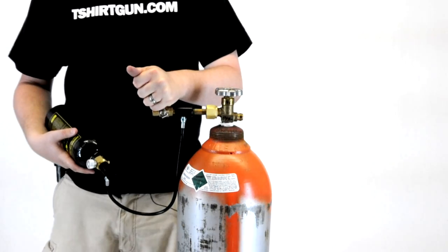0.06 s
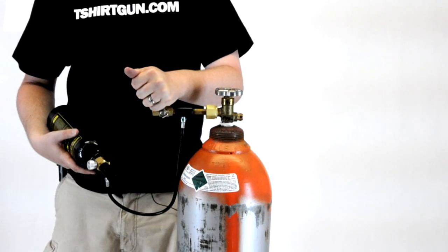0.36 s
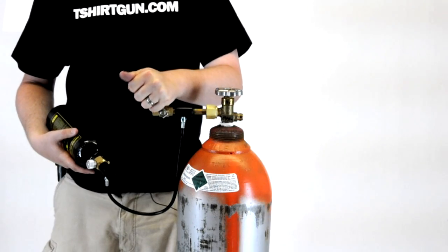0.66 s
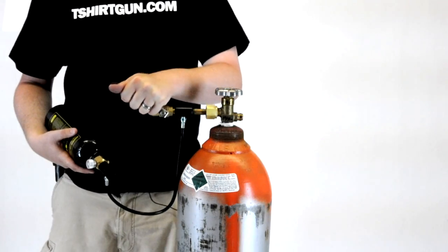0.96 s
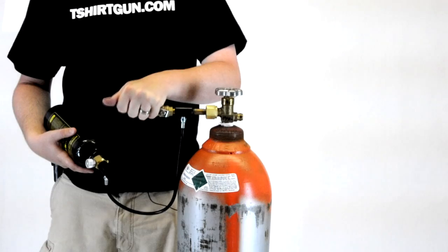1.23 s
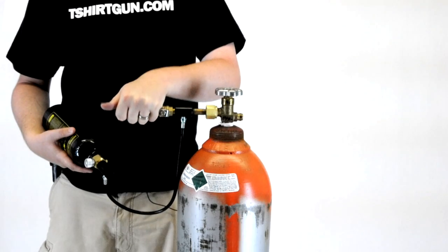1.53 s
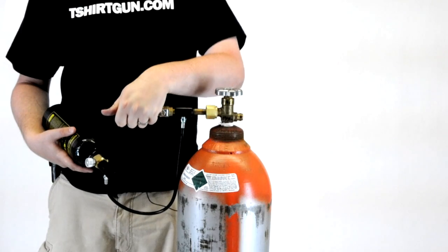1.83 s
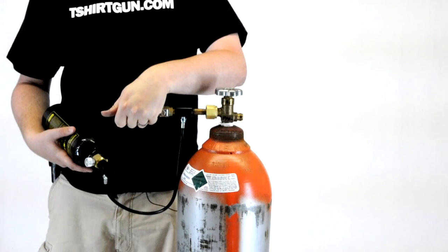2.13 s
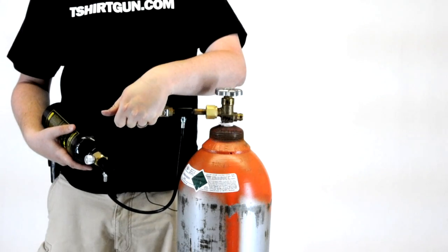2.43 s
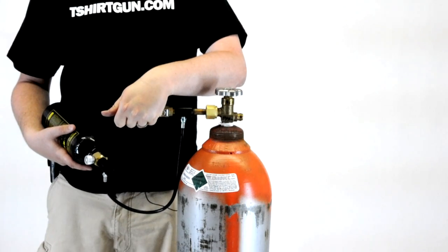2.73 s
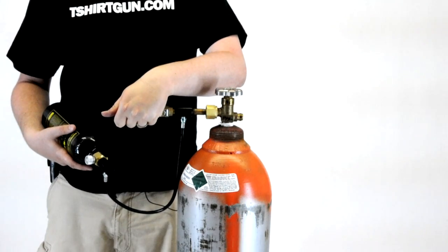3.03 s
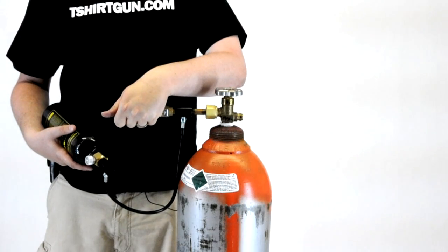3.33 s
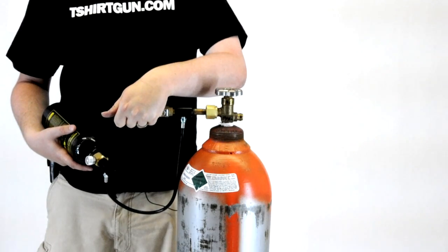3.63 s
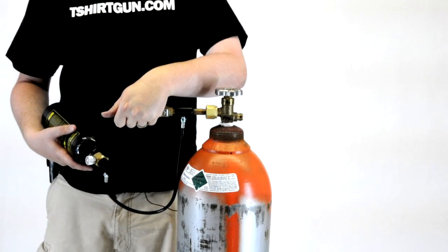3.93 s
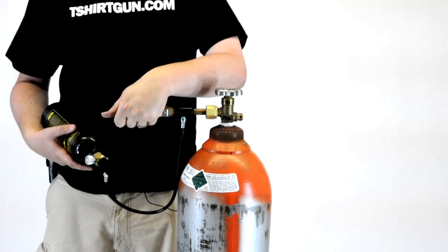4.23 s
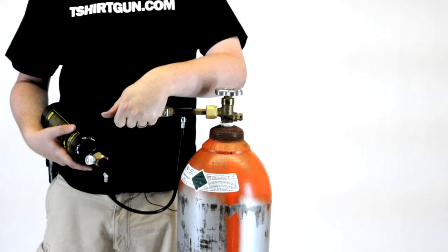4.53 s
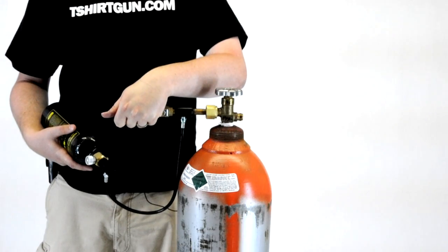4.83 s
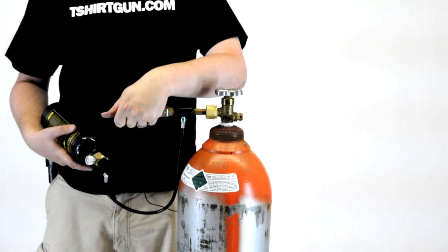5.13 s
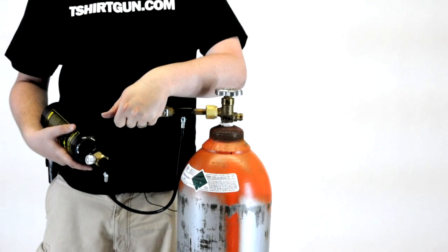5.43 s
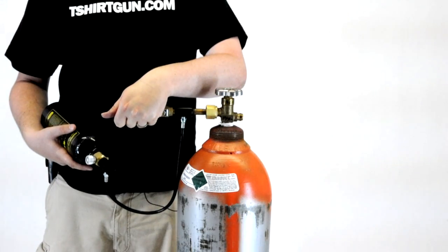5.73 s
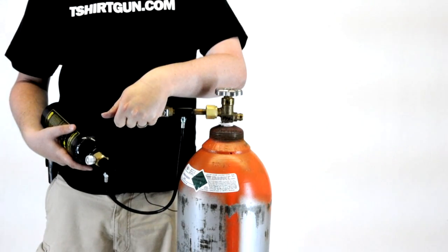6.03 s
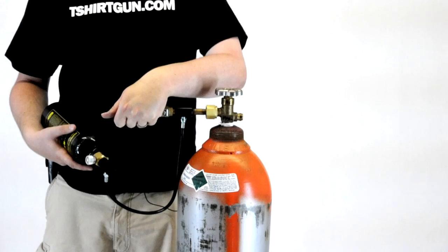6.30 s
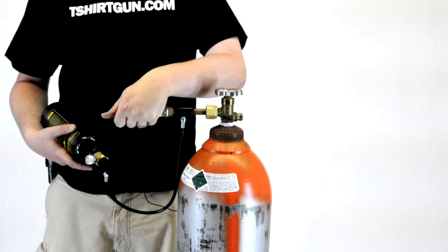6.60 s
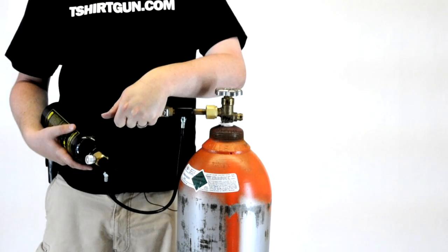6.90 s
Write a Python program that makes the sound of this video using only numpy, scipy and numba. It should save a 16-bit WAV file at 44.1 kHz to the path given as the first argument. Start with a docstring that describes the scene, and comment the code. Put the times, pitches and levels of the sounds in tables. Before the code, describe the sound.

Gas hisses loudly and steadily from a cylinder's hose valve, its tone shifting as a hand moves over the vent.

```python
"""Compressed gas hissing from the bleed valve on a tall cylinder's filling hose, in a small room.
The turbulent jet rings the air spaces of the fitting and of the hand that turns it. The hand crosses
the jet, cups the vent, rolls to rest and once grips tighter; each move changes the resonances, and
finger edges flare briefly in the stream. One microphone takes the direct hiss, reflections off nearby
surfaces and a faint room rumble, with slow gain control on the recorder."""
import sys
import numpy as np
from scipy import signal
from scipy.fft import rfft, irfft
from scipy.io import wavfile
from scipy.ndimage import uniform_filter1d
from numba import njit

SR = 44100
rng = np.random.default_rng(int(sys.argv[2]) if len(sys.argv) > 2 else 0)


def transcribe(u):
    """Save the signal u as a 16-bit wav file named by the first command-line argument.

    u: samples, shape (n,) or (channels, n), limited to [-1, 1]; the rate is SR.
    q: integer samples, one column per channel.
    """
    v = np.clip(np.atleast_2d(u).T, -1, 1)
    q = np.round(v * 32767).astype(np.int16)
    wavfile.write(sys.argv[1], SR, q)


N = 311346

# The room's low rumble: frequency_hz, level_db
RUMBLE_SPECTRUM = [(12, -73.5), (25, -89), (40, -82.5), (75, -83), (130, -82), (220, -90), (500, -100)]
# Early reflections off the cylinder, floor and walls: delay_ms, signed_gain
EARLY_REFLECTIONS = [(1.336, 0.043), (1.436, -0.08), (5.508, -0.034), (6.432, 0.034), (6.604, 0.039),
                     (6.828, 0.057), (6.992, -0.04), (7.18, -0.033), (8.72, 0.039), (9.024, 0.052),
                     (9.34, 0.047), (10.724, 0.044), (10.972, 0.034), (11.348, -0.03), (12.288, 0.032),
                     (14.064, 0.036)]
# Brief cancellations where the hand's reflection meets the direct hiss:
# middle_s, length_s, centre_hz, width_hz, depth_db
PASSING_NOTCHES = [(.78, .1, 11540, 1050, -4), (1.11, .28, 13860, 2160, -10.3),
                   (1.28, .2, 3290, 1210, -5.6), (1.43, .22, 9950, 410, -7.9), (1.82, .44, 5600, 710, -4),
                   (1.93, .3, 14840, 2110, -5.9)]
# Bands that the fitting always cancels: centre_hz, width_hz, depth_db
FITTING_BANDS = [(7080, 225, -2.5), (10120, 385, -1.5), (13670, 415, -3)]
# The jet grazing finger edges: middle_s, length_s, pitch_hz, glide_hz_per_s, width_hz, level_db
FINGER_FLARES = [(.72, .27, 4370, 900, 840, -47.5), (.72, .19, 9330, 4800, 1190, -58.1),
                 (.73, .18, 13260, 13200, 1150, -63.4), (0.972, 0.22, 5040, -240, 1490, -48.9),
                 (1.175, .19, 1920, -890, 1200, -53), (1.29, .27, 12400, 960, 890, -61.3),
                 (1.32, .26, 804, 430, 446, -62), (1.52, .25, 2780, 180, 255, -52),
                 (1.6, 0.28, 10400, 640, 900, -58.2), (1.7, .14, 13670, 350, 880, -62.2),
                 (1.87, .12, 12470, -190, 960, -61), (1.88, .25, 8640, -1175, 710, -55.1),
                 (2.06, 0.36, 2945, -60, 680, -54.3)]
# Air spaces of hand and fitting, from the hand's hollow up through palm, fingers and vent to a thin sizzle:
# start_hz, rest_hz, grip_shift_hz, width_hz, level_db, cup_gain_db, roll_gain_db, grip_gain_db
AIR_SPACES = [(760, 930, 2, 460, -77, 9.1, 1.1, -.5), (929, 935, -1, 45, -78.5, 20, -6, 1),
              (1730, 1545, 40, 1310, -68.5, 4.5, 4, 2.2), (3050, 3178, -255, 1570, -62.5, -6.5, 20, -1.6),
              (4510, 4840, 170, 1070, -50, 5, -5, -1.1), (5390, 5770, 0, 1200, -55, 1.35, -0.36, 4),
              (6360, 6603, -83, 630, -62, 14.6, -4.5, 3), (7300, 7340, 425, 1900, -56, 0.7, -3.5, -7),
              (9070, 8370, -100, 800, -62.5, 0.8, 6, -3), (10430, 11250, -135, 1220, -64, -1.9, -1, 0.7),
              (12340, 12430, 140, 1860, -63.5, 1.3, -6.5, 4),
              (13690, 13960, 60, 620, -62.3, -9.6, -5.6, -.5)]
# The free jet's hiss: frequency_hz, level_db
HISS_SPECTRUM = [(150.0, -77.5), (300.0, -76), (500.0, -71), (800.0, -69.5), (1300.0, -71), (2300.0, -66),
                 (3800.0, -59.5), (7000.0, -73), (9500.0, -70), (12000.0, -73), (15500.0, -76)]

TIME_S = np.arange(N) / SR
BIN_HZ = np.maximum(np.arange(N // 2 + 1) * SR / N, 1)
PIVOT_HZ = 4000  # the hiss tilts about this frequency as it dulls


def undb(db):
    """Decibels to gain."""
    return 10 ** (np.asarray(db) / 20)


def white():
    """White noise of 0 dB per Hz."""
    return rng.standard_normal(N) * np.sqrt(SR / 2)


def shaped_noise(spectrum):
    """Noise following (frequency_hz, level_db) points joined on a log-frequency axis."""
    hz, db = np.transpose(spectrum)
    gain = undb(np.interp(np.log(BIN_HZ), np.log(hz), db))
    return irfft(rfft(white()) * gain, N)


def drift(rate_hz):
    """Smooth random motion with a spread of 1 and rate_hz new values a second."""
    hold = int(SR / rate_hz)
    steps = np.repeat(rng.standard_normal(N // hold + 1), hold)
    smooth = uniform_filter1d(uniform_filter1d(steps, hold), hold)[:N]
    return smooth / smooth.std()


def ramp(middle_s, length_s):
    """A smooth move from 0 to 1, half done at middle_s."""
    return .5 + .5 * np.sin(np.pi * np.clip((TIME_S - middle_s) / length_s, -.5, .5))


def swell(middle_s, length_s):
    """A bell from 0 up to 1 and back, length_s wide at half its power."""
    return .5 ** (2 * ((TIME_S - middle_s) / length_s) ** 2)


@njit
def band_pass(x, centre_hz, width_hz):
    """State-variable band-pass with a moving centre, where its gain is 1."""
    angle = 2 * np.pi * np.minimum(centre_hz, .45 * SR) / SR
    tuning = np.tan(angle / 2)
    damping = 2 * np.pi * width_hz / SR / np.sin(angle)
    out, band_state, low_state = np.empty(len(x)), 0., 0.
    for i, g in enumerate(tuning):
        band = (band_state + g * (x[i] - low_state)) / (1 + g * (g + damping[i]))
        band_state = 2 * band - band_state
        low_state += 2 * g * band
        out[i] = damping[i] * band
    return out


def notch(x, centre_hz, width_hz, depth_db):
    """Hollow out one band; its centre and depth may move."""
    return x - (1 - undb(depth_db)) * band_pass(x, centre_hz * np.ones(N), width_hz)


def room_rumble(rise_db=2.0):
    """Room tone: a faint low rumble, a little stronger near the end."""
    return shaped_noise(RUMBLE_SPECTRUM) * undb(rise_db * ramp(middle_s=5.9, length_s=.6))


def small_room(x, tail_db=-10.0, t60_s=0.23, onset_s=.005):
    """Nearby surfaces comb the hiss at the microphone; a short diffuse tail adds finer ripples."""
    t = np.arange(SR // 4) / SR
    tail = rng.standard_normal(len(t)) * np.exp(-np.log(1000) * t / t60_s) * (t > onset_s)
    response = tail * undb(tail_db) / np.linalg.norm(tail)
    response[0] = 1  # the direct path
    for delay_ms, gain in EARLY_REFLECTIONS:
        response += gain * np.sinc((t - delay_ms / 1000) * SR)
    return signal.fftconvolve(x, response / np.linalg.norm(response))[:N]


def hand_moves(roll_start_s=.75, settle_s=1.18):
    """The hand passes between jet and microphone, cups the vent, rolls to rest and grips; each 0-1."""
    cross = swell(middle_s=1.05, length_s=.24) ** 2
    cup = ramp(middle_s=1.117, length_s=.14)
    roll = 1 - np.exp(-np.maximum(TIME_S - roll_start_s, 0) / settle_s)
    grip = ramp(middle_s=2.4, length_s=.2) - ramp(middle_s=3.75, length_s=.2)
    return cross, cup, roll, grip


def hand_reflection(x, cup, roll, start_hz=3060, rest_hz=4350, cupped_db=-8.5, easing_db=5.0):
    """The cupped hand cancels a band that rises and eases as it rolls; others dip in passing."""
    cupped_hz = start_hz + (rest_hz - start_hz) * roll
    x = notch(x, cupped_hz, width_hz=560, depth_db=cup * (cupped_db + easing_db * roll))
    for middle_s, length_s, centre_hz, width_hz, depth_db in PASSING_NOTCHES:
        x = notch(x, centre_hz, width_hz, depth_db * swell(middle_s, length_s) ** 2)
    return x


def resonance(pitch_hz, width_hz, level_db, flutter_db=0.18, wander=0.0058):
    """Turbulence rings one air space; eddies shake its strength and its pitch a little."""
    shaken_hz = pitch_hz * (1 + wander * drift(20))
    ring = band_pass(white(), shaken_hz, width_hz)
    ring = band_pass(ring, shaken_hz, width_hz)  # a second pass narrows the band
    return ring * undb(level_db + flutter_db * drift(18))


def finger_flares():
    """Each finger edge in the stream gives a breathy whistle that swells, glides and fades."""
    out = 0
    for middle_s, length_s, pitch_hz, glide_hz_per_s, width_hz, level_db in FINGER_FLARES:
        glide_hz = glide_hz_per_s * np.clip(TIME_S - middle_s, -length_s, length_s)
        out += resonance(pitch_hz + glide_hz, width_hz, level_db) * swell(middle_s, length_s)
    return out


def air_spaces(cross, cup, roll, grip, shadow_hz=5600, shadow_db_per_octave=-14.0, sizzle_hz=9500):
    """The resonances slide and swell with the hand, which shadows the high ones as it crosses."""
    out = 0
    sputter_db = drift(40)  # only the sizzle on top sputters
    tilt_db_per_octave = -0.1322 * TIME_S  # slow dulling
    for start_hz, rest_hz, grip_hz, width_hz, level_db, cup_db, roll_db, grip_db in AIR_SPACES:
        pitch_hz = start_hz + (rest_hz - start_hz) * roll + grip_hz * grip
        level_db += cup_db * cup + roll_db * roll + grip_db * grip
        level_db += tilt_db_per_octave * np.log2(start_hz / PIVOT_HZ)
        level_db += cross * shadow_db_per_octave * max(np.log2(start_hz / shadow_hz), 0)
        level_db += sputter_db * (start_hz > sizzle_hz)
        out += resonance(pitch_hz, width_hz, level_db)
    return out


def free_jet(cross, open_db=4.1, screen_db=-6.0, cross_db=-1.0, low_cut_hz=130):
    """Broad mixing noise, screened by the nearing hand and slowly dulling as the gas runs."""
    level_db = open_db + screen_db * ramp(middle_s=.62, length_s=.45) + cross_db * cross
    tilt_db_per_octave = 2.0 - 0.35 * TIME_S
    low_cut = signal.butter(2, low_cut_hz, "high", fs=SR, output="sos")
    spectrum = rfft(signal.sosfilt(low_cut, shaped_noise(HISS_SPECTRUM)))
    out, octaves = 0, np.arange(-3, 3)
    for octave in octaves:
        band_weight = np.interp(np.log2(BIN_HZ / PIVOT_HZ), octaves, octaves == octave)
        out += irfft(spectrum * band_weight, N) * undb(level_db + tilt_db_per_octave * octave)
    return out


def venting_gas(cross, cup, roll, grip, surge_db=0.57):
    """At the valve: jet, resonances and flares, notched by the fitting; the whole flow surges slightly."""
    gas = free_jet(cross) + air_spaces(cross, cup, roll, grip) + finger_flares()
    for centre_hz, width_hz, depth_db in FITTING_BANDS:
        gas = notch(gas, centre_hz, width_hz, depth_db)
    return gas * undb(surge_db * drift(12))


def scene(gas_db=0.4):
    """At the microphone: gas, hollowed by the hand, over room tone; the same in both channels."""
    cross, cup, roll, grip = hand_moves()
    gas = venting_gas(cross, cup, roll, grip)
    hollowed = hand_reflection(gas, cup, roll)
    microphone = undb(gas_db) * small_room(hollowed) + room_rumble()
    return np.array([microphone, microphone])


def record(dry, target_db=-15.0, ratio=3, follow_s=0.21, top_hz=15700):
    """The recorder's slow gain control evens out the loud hiss; a steep filter cuts the top."""
    power = uniform_filter1d(dry[0] ** 2, int(follow_s * SR))
    gain = (undb(target_db) / np.sqrt(power)) ** (1 - 1 / ratio)
    high_cut = signal.ellip(12, .1, 90, top_hz, fs=SR, output="sos")
    return signal.sosfilt(high_cut, dry * gain)


dry = scene()
out = record(dry)
transcribe(out)
```